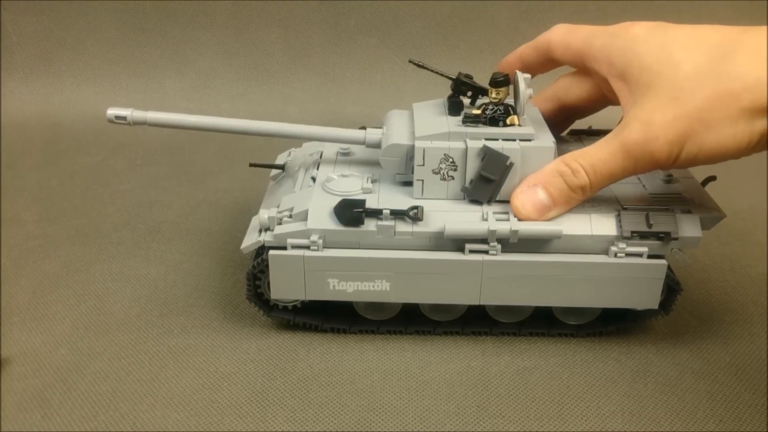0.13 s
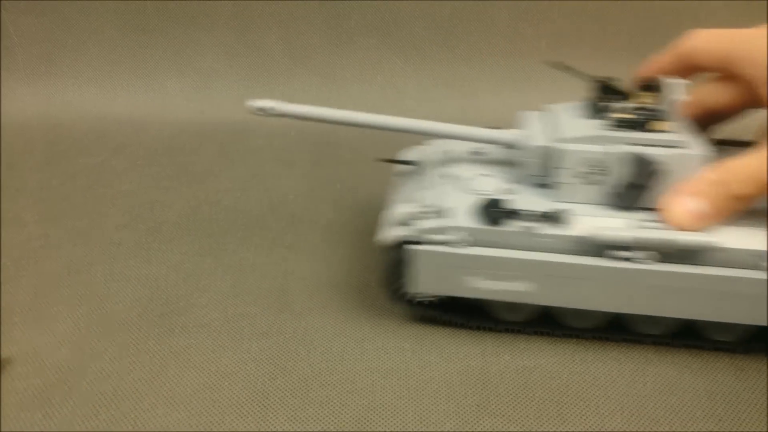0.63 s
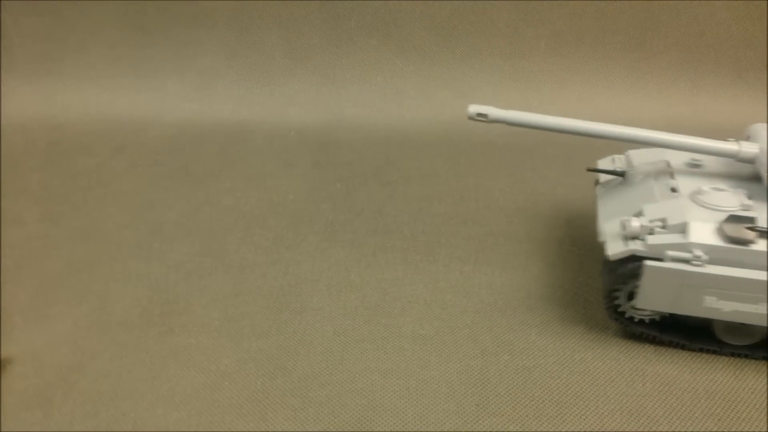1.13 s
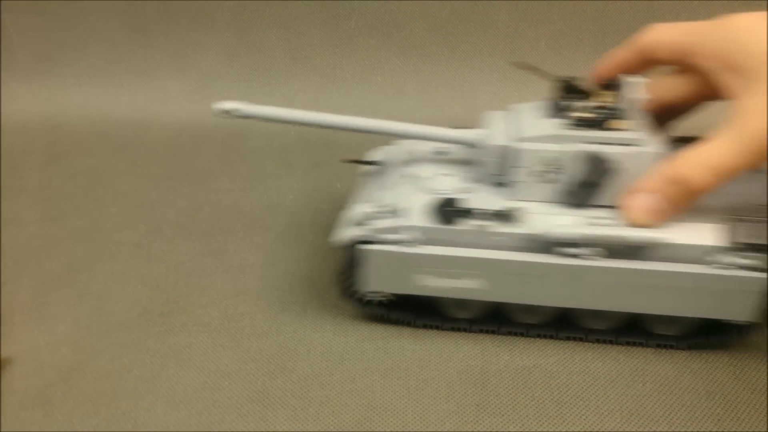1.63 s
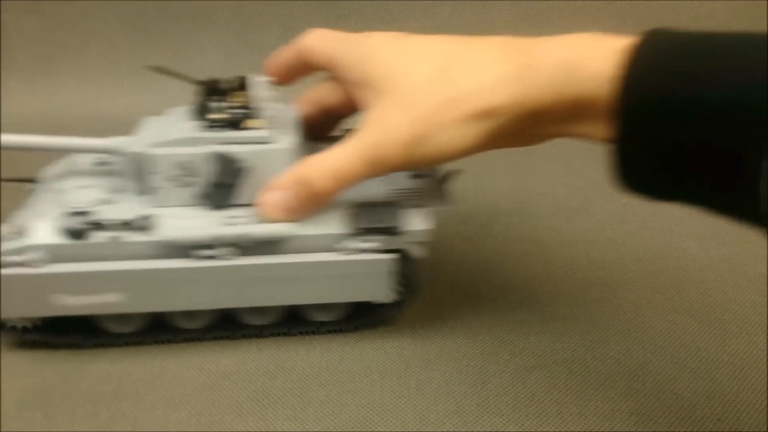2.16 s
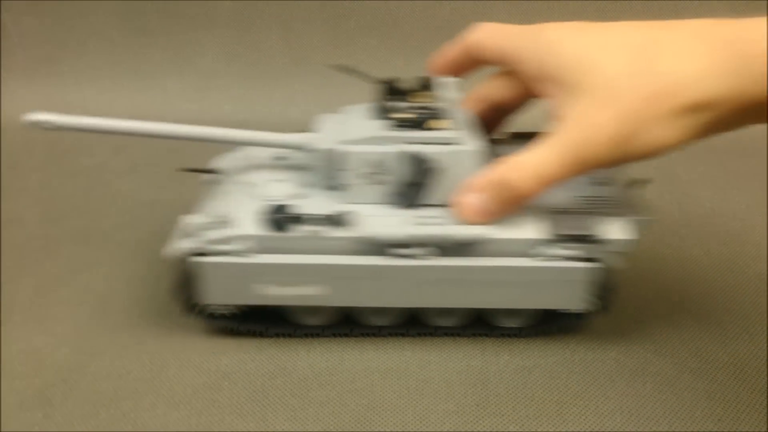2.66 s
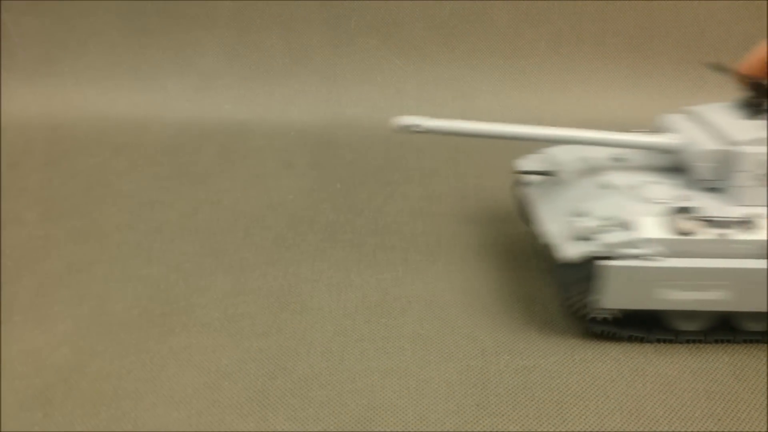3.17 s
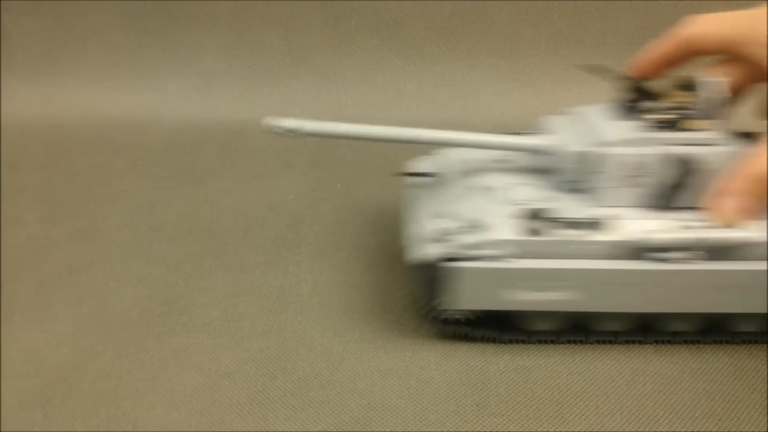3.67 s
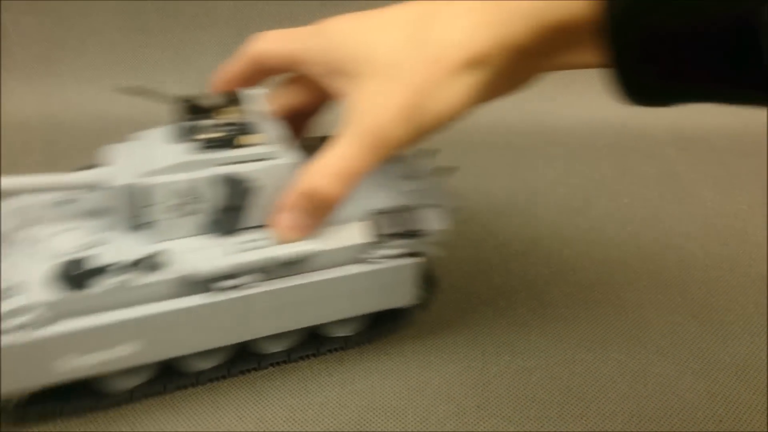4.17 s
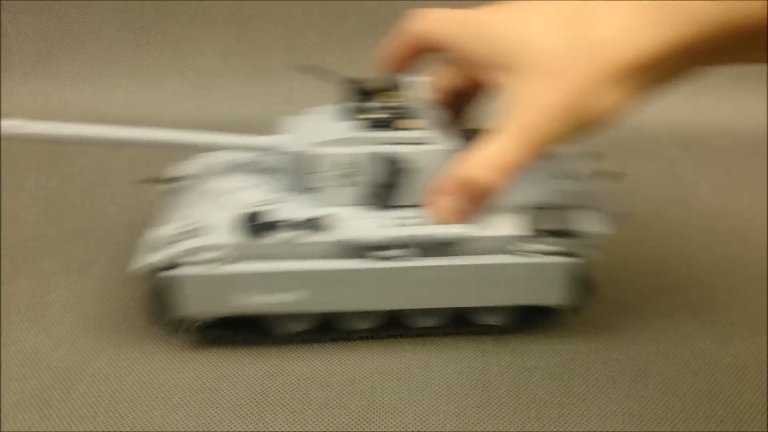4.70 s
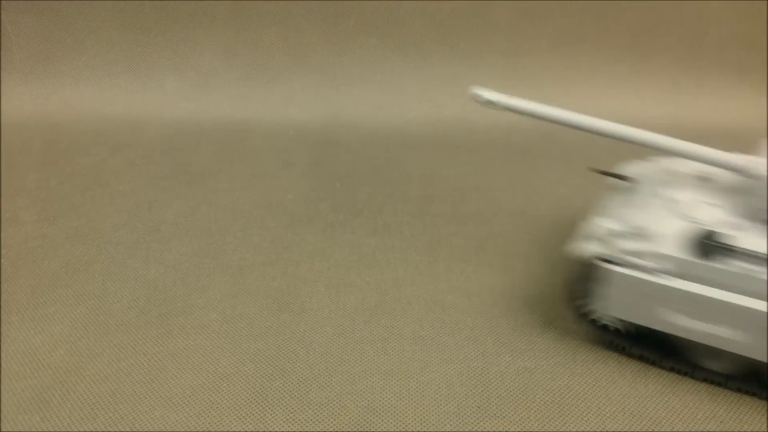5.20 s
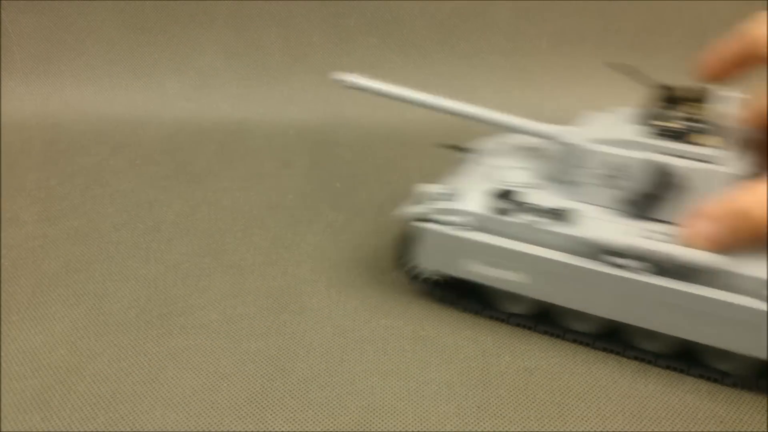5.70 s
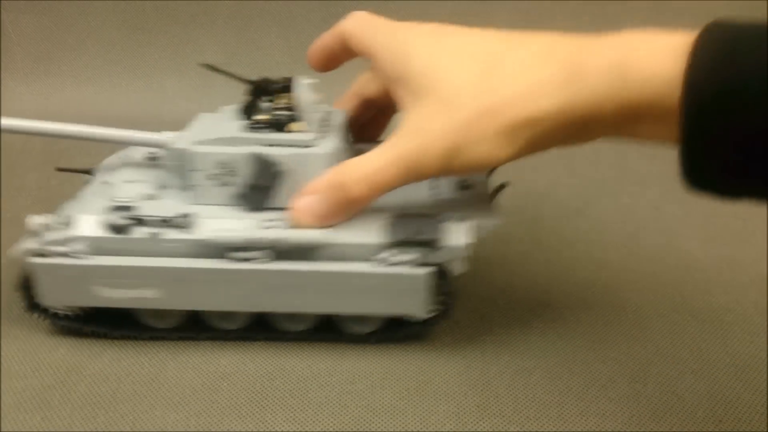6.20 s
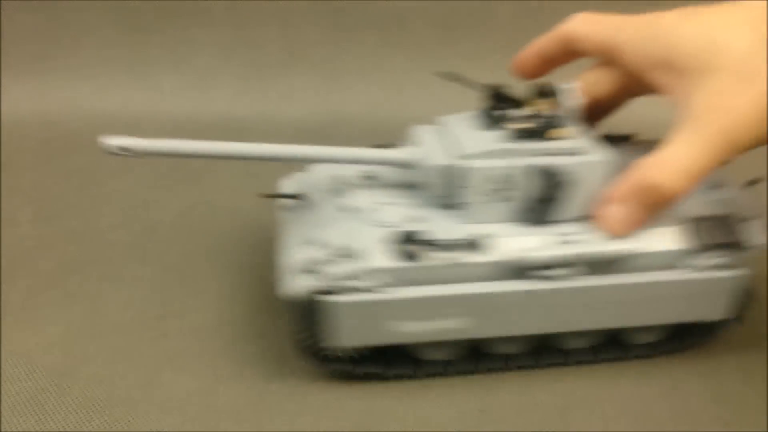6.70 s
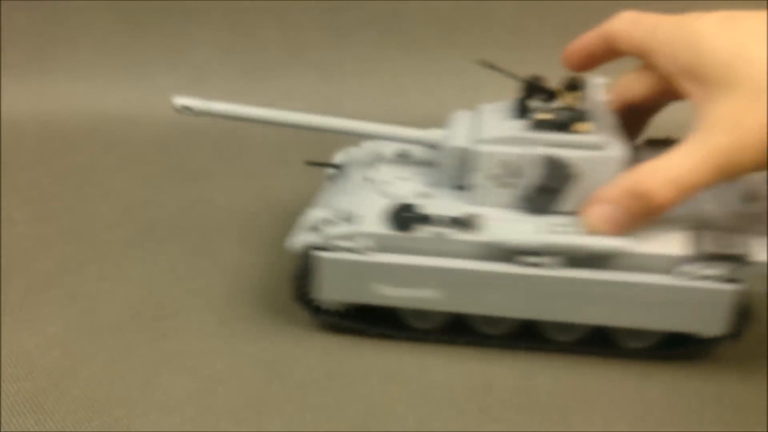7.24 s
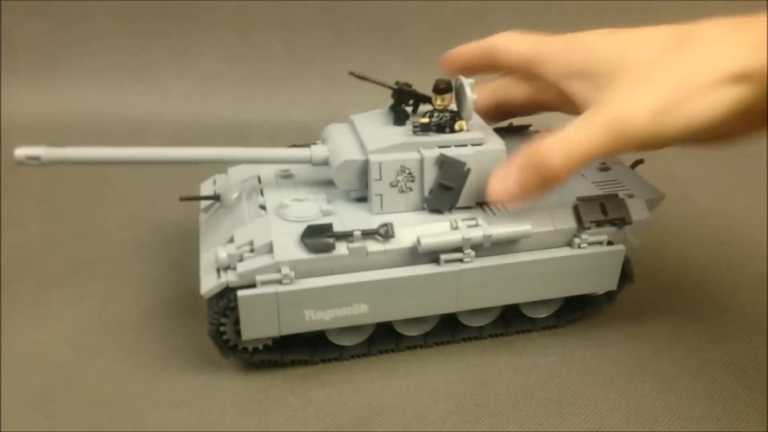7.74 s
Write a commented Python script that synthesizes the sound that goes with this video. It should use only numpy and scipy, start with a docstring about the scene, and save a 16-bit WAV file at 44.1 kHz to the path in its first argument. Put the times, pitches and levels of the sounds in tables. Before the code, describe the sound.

Close up in a quiet room, small plastic track links snap and rattle over sprocket teeth in about eight hand-driven strokes, each roughly a second or less, separated by brief lulls. Bright, dry clicks ride on a hollow hull rattle and a bassy table boom. Light taps come first; a gentler slow stroke finishes, with faint thin rising tones over soft room noise.

```python
"""Model tank on a cloth-covered table

A brick-built model tank is rolled back and forth by hand in a quiet room, after a few finger taps on its hull.
Track links snap over the sprocket teeth, up to about twenty times a second: bursts of clicks ring plastic modes.
Smaller contacts rattle between the snaps and stir hull and table top; the table booms and sways in the bass.
Steady noise of room and microphone lies below, and two faint tones glide up at the end."""
import sys
import numpy as np
from scipy import signal
from scipy.fft import rfft, irfft
from scipy.io import wavfile

SR = 44100
rng = np.random.default_rng(int(sys.argv[2]) if len(sys.argv) > 2 else 0)


def attenuation_scalar(level_db):
    """Turn a level in dB into a linear amplitude multiplier (20 dB per decade)."""
    decades = np.asarray(level_db, float) / 20
    return 10 ** decades


def log_audio(samples):
    """Write samples as a 16-bit WAV file to the path given in sys.argv[1]."""
    # one column per channel
    frames = np.atleast_2d(samples).T
    # limit to full scale, then quantise
    limited = np.clip(frames, -1, 1)
    pcm = np.round(limited * 32767).astype(np.int16)
    wavfile.write(sys.argv[1], SR, pcm)


N = 346317

# modes of the table top: (frequency [Hz], width [Hz], relative level [dB])
TABLE_MODES = [(200, 44, -15), (269.4, 31, -8), (331, 94, -9.5), (413, 270, -6.5), (577, 180, 0.5),
               (740, 147, 2), (856, 350, -9.5)]
# modes of the hollow hull: (frequency [Hz], width [Hz], relative level [dB])
HULL_MODES = [(1160, 150, -7.5), (1377, 170, -6.5), (1588, 117, -8.5), (1816, 104, -6.5), (2053, 340, -5.5)]
# low ring of the plastic links: (frequency [Hz], width [Hz], relative level [dB])
LOW_MODES = [(2520, 740, -1), (3092, 340, -5), (3390, 180, -10.5), (3750, 330, -6)]
# middle ring of the links: (frequency [Hz], width [Hz], relative level [dB])
MIDDLE_MODES = [(4160, 430, -9.5), (4814, 360, -4.5), (5075, 360, -13), (5140, 980, -9.5), (5750, 3100, -4)]
# bright ring of the links: (frequency [Hz], width [Hz], relative level [dB])
BRIGHT_MODES = [(6970, 940, -5.5), (7900, 410, -5), (8266, 630, 0.5), (8800, 1200, -10), (9490, 900, -9.5)]
# topmost edge of the ring: (frequency [Hz], width [Hz], relative level [dB])
EDGE_MODES = [(12260, 1800, 9), (13700, 1300, -17), (14300, 1200, -16), (13900, 1200, -48)]

FULL_SPEED_DB = -45  # rattle of a brisk stroke


def rms_one(x):
    """Scales a signal to rms 1."""
    return x / np.sqrt(np.mean(x ** 2) + 1e-20)


def drift(rate_hz):
    """Slow chance: noise through two equal one-pole lowpasses at this rate, rms 1."""
    r = np.exp(-2 * np.pi * rate_hz / SR)
    noise = rng.standard_normal(N + 9000)
    return rms_one(signal.lfilter([1], [1, -2 * r, r * r], noise)[9000:])


def controls(rows):
    """Columns of a curve table, interpolated per sample."""
    s, *columns = np.transpose(rows)
    return [np.interp(np.arange(N) / SR, s, c) for c in columns]


def ring(clicks, hz, width_hz):
    """A unit click sets a dying sine of starting height 1 ringing; a wider mode dies sooner."""
    r, w = np.exp(-np.pi * width_hz / SR), 2 * np.pi * hz / SR
    return signal.lfilter([0, np.sin(w)], [1, -2 * r * np.cos(w), r * r], clicks + 1e-18)


def within(modes, x):
    """Plastic meets plastic softly: little is heard far above or below the ringing range."""
    band_hz = [0.7 * modes[0][0], 1.15 * modes[-1][0]]
    return signal.sosfilt(signal.butter(3, band_hz, "band", fs=SR, output="sos"), x)


def rattle(modes, per_s, uneven_db, clumps, shift_db=0):
    """Random contacts in clumps stir every mode; the favoured modes shift as the load moves. Rms 1."""
    happens = rng.random(N) < per_s / SR
    size_db = uneven_db * np.minimum(rng.exponential(1, N), 4) + clumps
    sizes = attenuation_scalar(size_db) * happens
    out = np.zeros(N)
    for hz, width_hz, db in modes:
        favour = attenuation_scalar(db + shift_db * drift(6.0))
        contacts = sizes * rng.standard_normal(N)
        out += favour * np.sqrt(width_hz) * ring(contacts, hz, width_hz)
    return rms_one(within(modes, out))


def strike(modes, seconds, shape_db, rms_db, length_s, colour_db):
    """Bursts of contacts ring the modes, each favouring other ones, set to its rms level over its length."""
    at = np.minimum(seconds * SR, N - 1).astype(int)
    colour = colour_db * rng.standard_normal((len(at), 1, len(modes)))
    luck = rng.standard_normal((len(at), at.shape[1], len(modes)))

    def sound(gain):
        out = np.zeros(N)
        for k, (hz, width_hz, db) in enumerate(modes):
            heights = gain * attenuation_scalar(db + colour[..., k]) * luck[..., k]
            out += ring(np.bincount(at.ravel(), heights.ravel(), N), hz, width_hz)
        return within(modes, out)

    # a first pass finds the power of each burst, a second corrects its gain
    gain = attenuation_scalar(shape_db + rms_db)
    energy = np.cumsum(sound(gain) ** 2)
    span = (length_s * SR).astype(int) + 30
    start = at[:, :1]
    heard = (energy[np.minimum(start + span, N - 1)] - energy[start]) / span
    return sound(gain * attenuation_scalar(rms_db) / np.sqrt(heard))


def motion():
    """Levels [dB] of links, hull and treble through all strokes, dropping while the tracks stand still."""
    # before the first push: (time [s], rattle [dB], hull over rattle [dB], treble over rattle [dB])
    at_rest = (0.0, -78.5, 3, -1)
    # one list per push or pull of the hand; rattle grows with speed:
    # (time [s], rattle [dB], hull over rattle [dB], treble over rattle [dB])
    strokes = [
        [(0.45, -85, 5, -7), (0.544, -60, -1, -4), (0.718, -45, -0.5, -5.5), (0.848, -44, 1, -1),
         (0.908, -47, -2, -5), (0.964, -48, 2, 2.5), (1.134, -53.5, 1.5, -2), (1.26, -66, -1, -10)],
        [(1.28, -67.5, -1, -3), (1.408, -51.5, -0.5, -8), (1.596, -45.5, -2, -7), (1.666, -46, -0.5, -2.5),
         (2.044, -45, 0, -4.5), (2.212, -44.5, 3.5, -3), (2.336, -46, 1, -2), (2.43, -64, 8, -3)],
        [(2.45, -59, 2, -6), (2.562, -49, 1, -0.5), (2.714, -46, -0.5, -1), (2.8, -45, -2, 0.5),
         (3.074, -46.5, 3, 0), (3.302, -49, 0.5, -1), (3.424, -50.5, 5, -4.5), (3.52, -63, 3, -3)],
        [(3.54, -57.5, -3, -6), (3.66, -45.5, -1, -1.5), (3.802, -45, -0.5, 1), (3.852, -44, -2, 1),
         (4.1, -42.5, 0.5, -2.5), (4.256, -43, 5.5, -2.5), (4.386, -45.5, 3.5, -4), (4.5, -57.5, 10, -7)],
        [(4.52, -58.5, 2.5, -5), (4.64, -47.5, 2.5, -2), (4.786, -42.5, 0, 2), (4.838, -42, 1, 0),
         (5.098, -44, 3.5, -2), (5.188, -42.5, -0.5, -1), (5.388, -47.5, -1, -3.5), (5.5, -64, 5, -7)],
        [(5.52, -61.5, 5.5, -9), (5.63, -44, -0.5, -3), (5.778, -46.5, 1, 0.5), (6.114, -43.5, 4, -5),
         (6.184, -42.5, 4.5, -5), (6.308, -44, 0.5, -4.5), (6.42, -64, 5, -13)],
        [(6.44, -61.5, 5, -11), (6.572, -47, 0.5, 3), (6.704, -46, 5.5, 1), (6.79, -47, 3.5, 1.5),
         (6.882, -47.5, 2, 1.5), (7.006, -47.5, 4.5, -2), (7.13, -74, 7, -8)],
        [(7.16, -62, 1, -5), (7.254, -52.5, 0.5, -5), (7.384, -53, 0, -4), (7.472, -52.5, -0.5, -4),
         (7.544, -54, 3.5, 0), (7.7, -62, 5.5, -2), (7.85, -71, 4, -3)],
    ]
    # the hand turns round: (stop [s], restart [s], drop [dB])
    halts = [(0.3, 0.541, 2.5), (1.205, 1.34, 1), (2.398, 2.48, 7.5), (3.477, 3.568, 3), (4.46, 4.549, 9.5),
             (5.48, 5.544, 5.5), (6.385, 6.465, 5), (7.055, 7.155, 3), (7.72, 7.9, 5.5)]
    settle_s, catch_s = 0.025, 0.0069
    link, hull, bright = controls([at_rest] + [row for stroke in strokes for row in stroke])
    for stop, restart, drop_db in halts:
        corners_s = [stop - settle_s, stop, restart - catch_s, restart]
        link = link - np.interp(np.arange(N) / SR, corners_s, [0, drop_db, drop_db, 0])
    return link, link + hull, link + bright


def hush():
    """Steady noise of room and microphone, coloured in the spectrum."""
    # shape of the hush: (frequency [Hz], relative density [dB])
    air = [(53, -31), (90, -9.5), (114, -10.5), (170, -20), (256, -20), (390, -15), (570, -30),
           (1180, -29.5), (1600, -42), (7500, -45.5), (12000, -50), (15500, -43), (16400, -59)]
    points_hz, db = np.transpose(air)
    hz = np.maximum(np.fft.rfftfreq(N, 1 / SR), 1)
    colour = attenuation_scalar(np.interp(np.log(hz), np.log(points_hz), db))
    noise = irfft(rfft(rng.standard_normal(N)) * colour, N)
    return attenuation_scalar(-65) * rms_one(noise)


def whistle():
    """Two thin tones at a fixed pitch ratio glide up together at the end."""
    start_s, start_hz, rise_hz_per_s, level_db = 7.79, 8500, 15000, -76
    upper_ratio, upper_db = 1.235, -4  # upper tone against the lower
    t = np.maximum(np.arange(N) / SR - start_s, 0)
    phase = 2 * np.pi * (start_hz * t + rise_hz_per_s * t ** 2 / 2)
    fade_in = np.minimum(t / 0.012, 1)
    return attenuation_scalar(level_db) * fade_in * (np.sin(phase) + attenuation_scalar(upper_db) * np.sin(upper_ratio * phase))


def bass():
    """The table top booms and thumps under the weight, and the whole frame sways and heaves."""
    # boom of the table top: (frequency [Hz], width [Hz], relative level [dB])
    boom_modes = [(120, 30, -17), (153, 10, 0)]
    # thump of the table top: (frequency [Hz], width [Hz], relative level [dB])
    thump_modes = [(64.6, 10.6, -4.5), (86, 33, -6.5)]
    # sway of the frame: (frequency [Hz], width [Hz], relative level [dB])
    sway_modes = [(26.7, 7.7, -1), (36.6, 30, 1)]
    # slower heave of the frame: (frequency [Hz], width [Hz], relative level [dB])
    heave_modes = [(9, 8.5, 0.5), (14, 33, 2.4)]
    # course of the boom: (time [s], level [dB])
    boom_level = [(0.0, -72), (0.06, -85), (0.83, -59.5), (1.22, -68.5), (2.08, -51), (2.49, -67),
                  (2.53, -52.5), (3.26, -59.5), (3.48, -73), (3.82, -48.5), (4.44, -61), (5.18, -47.5),
                  (5.46, -73), (5.73, -48), (6.01, -62), (6.21, -52.5), (6.43, -74), (6.52, -57.5),
                  (6.95, -55.5), (7.06, -69), (7.54, -58.5), (7.85, -72)]
    # course of the frame's motion, before it wavers: (time [s], sway [dB], heave [dB])
    frame_level = [(0.0, -31, -69), (0.08, -56.5, -54), (2.41, -49, -53.5), (3.45, -60.5, -58.5),
                   (3.54, -48.5, -52.5), (5.42, -53, -57.5), (5.64, -66, -44.5), (5.77, -54, -70),
                   (6.08, -55, -43.5), (7.45, -49, -38), (7.63, -42, -51), (7.85, -49, -43)]
    boom_db, = controls(boom_level)
    # at full speed -49 dB; follows 0.45 of the rattle's swing and wavers by 1 dB
    thump_db = -49 + 0.45 * (motion()[0] - FULL_SPEED_DB) + 1 * drift(3.3)
    sway_db, heave_db = (db + 4 * drift(1.56) for db in controls(frame_level))
    parts = [(boom_db, boom_modes), (thump_db, thump_modes), (sway_db, sway_modes), (heave_db, heave_modes)]
    return sum(attenuation_scalar(db) * rattle(modes, per_s=980, uneven_db=2.0, clumps=0) for db, modes in parts)


def taps():
    """A fingertip lands softly in a few contacts and stirs table and hull."""
    # finger taps before the first push: (time [s], deep table [dB], upper table [dB], hull [dB])
    tap_rows = [(0.258, -68, -68, -84), (0.27, -67, -64, -80), (0.287, -73, -68, -85),
                (0.301, -82, -74, -82), (0.333, -61, -67, -65), (0.342, -62, -67, -67),
                (0.385, -59, -73, -71)]
    s, deep, upper, hull = np.transpose(tap_rows)[:, :, None]
    seconds = s + 0.0037 * np.sort(rng.random((len(tap_rows), 4)), axis=1)
    flat, length_s = np.zeros_like(seconds), np.full_like(s, 0.0084)
    parts = [(TABLE_MODES[1:4], deep), (TABLE_MODES[4:], upper), (HULL_MODES, hull)]
    return sum(strike(modes, seconds, flat, db, length_s, colour_db=3.0) for modes, db in parts)


def rolling():
    """Small contacts of links, wheels and cloth ring each part; jolts shake all parts at once."""
    link_db, hull_db, bright_db = motion()
    hull, link, bright = attenuation_scalar([hull_db, link_db, bright_db])
    # the table rumbles at -49.5 dB at full speed and follows 0.71 of the rattle's swing
    table = attenuation_scalar(-49.5 + 0.71 * (link_db - FULL_SPEED_DB))
    jolts = drift(70)
    links = LOW_MODES + MIDDLE_MODES
    tank = hull * rattle(HULL_MODES, 1200, 1.3, 1.2 * jolts + 0.2 * drift(60), shift_db=1.5)
    tank += link * rattle(links, 2000, 0.53, 0.57 * jolts + 0.25 * drift(60), shift_db=0.44)
    tank += bright * rattle(BRIGHT_MODES, 2800, 2.5, 1.8 * jolts + 2.1 * drift(60), shift_db=-0.4)
    tank += bright * attenuation_scalar(-22.5) * rattle(EDGE_MODES, 5000, 1.5, 1.2 * jolts)
    # lone sharp ticks
    tank += bright * attenuation_scalar(-5.0) * rattle(links + BRIGHT_MODES, 110, 3.3, 0)
    return tank + table * rattle(TABLE_MODES, 1200, 1.8, 0.59 * jolts, shift_db=1.23)


def small_snaps():
    """Rows like the loud snaps, at random moments, as strong as the speed allows."""
    count, spread_db = 220, 3.5
    over_rattle_db = (-0.3, 1.5, -0.5)  # middle, low and bright ring
    s = rng.random(count) * (N - 1) / SR
    rattle_db = motion()[0][(s * SR).astype(int), None]
    levels = rattle_db + over_rattle_db + spread_db * rng.standard_normal((count, 3))
    length_ms = rng.uniform(0.72, 4.8, count)
    return np.column_stack([s, levels, length_ms])


def snaps():
    """A link seats in a burst of tiny contacts that swells fast and leaves a ragged tail."""
    # snaps that stand out: (time [s], middle ring [dB], low ring [dB], bright ring [dB], length [ms])
    loud_snaps = [(0.4538, -79, -69, -76, 3.4), (0.4804, -72, -64, -71, 6.6), (0.5104, -74, -62, -72, 5.9),
                  (0.5435, -68, -54, -62, 6.8), (0.5512, -65, -55, -65, 5.3), (0.593, -64, -47, -46, 4.6),
                  (0.642, -63, -60, -44, 1.1), (0.6727, -51, -43, -42, 5.1),
                  (0.6975, -26.5, -27.5, -29.5, 3.1), (0.7082, -42, -36, -35, 5.3),
                  (0.7519, -30, -30.5, -30.5, 5.1), (0.796, -34, -29, -32.5, 7.3),
                  (0.8018, -30, -39, -27, 4), (0.8387, -38, -36, -38, 4.9),
                  (0.8507, -24.5, -31, -29.5, 4.7), (0.8814, -42, -35, -37, 7.8),
                  (0.8992, -23.5, -33, -30.5, 3.7), (0.927, -45, -37, -43, 2.6),
                  (0.948, -28.5, -29.5, -25.5, 4.8), (0.9976, -28.5, -30, -25.5, 4.9),
                  (1.049, -29.5, -30, -30.5, 5), (1.1062, -36.5, -33.5, -36, 5.4),
                  (1.3502, -53, -51, -47, 2.7), (1.3953, -61, -56, -48, 4.7), (1.422, -49, -53, -48, 3.8),
                  (1.4496, -37, -35, -42, 5.2), (1.476, -50, -50, -42, 3), (1.4932, -37, -32, -39, 6.6),
                  (1.4994, -33, -34, -32.5, 5.9), (1.526, -48, -57, -41, 6.7), (1.547, -34, -34, -35, 7.5),
                  (1.5523, -27.5, -52, -39, 2.1), (1.5748, -43, -54, -34, 1.7),
                  (1.6012, -30, -37, -30.5, 2.1), (1.646, -31, -33, -32.5, 5.7),
                  (1.6979, -23.5, -30, -30.5, 1.85), (1.7421, -37, -34, -32, 4.4),
                  (1.7462, -28.5, -41, -33, 1.84), (1.7913, -33.5, -35, -33, 5),
                  (1.8359, -35, -39, -33.5, 3.9), (1.8413, -30, -34, -34, 3.6),
                  (1.8843, -30, -34.5, -31, 4.9), (1.8875, -34, -45, -34, 5.8),
                  (1.9327, -33.5, -38, -31.5, 7.6), (1.9791, -24.5, -34, -30.5, 4.2),
                  (2.0259, -28, -33.5, -33, 4), (2.0708, -25, -32, -34, 2.26),
                  (2.075, -34, -32, -28.5, 1.9), (2.1195, -30, -38, -34, 3.7),
                  (2.1214, -31, -35, -31.5, 3.4), (2.1397, -49, -50, -37, 2.4),
                  (2.171, -27, -31.5, -30.5, 3.6), (2.1847, -46, -45, -44, 2.4),
                  (2.215, -27, -31, -29, 5.5), (2.264, -24.5, -34, -25.5, 2.9),
                  (2.3127, -24, -31.5, -31, 2.15), (2.3617, -35, -36.5, -37, 2.14),
                  (2.6137, -21, -28, -27, 1.85), (2.666, -38, -39, -35.5, 3.1),
                  (2.6967, -42, -38.5, -57, 2.1), (2.8294, -33.5, -39, -38, 2.4),
                  (2.8745, -40, -52, -38, 3.3), (2.9032, -45, -36, -50, 1.9),
                  (3.0651, -51, -52, -38.5, 4.1), (3.4224, -31.5, -35, -34.5, 5),
                  (3.4444, -27, -38, -46.5, 1.9), (3.6674, -32, -32, -33.5, 2.64),
                  (3.6785, -33, -30, -38, 4.2), (3.7146, -27, -37, -33.5, 2.4),
                  (3.9114, -37, -39, -36, 1.3), (3.944, -46, -36, -31.5, 1.6), (3.973, -42, -47, -31, 1.8),
                  (4.0511, -47, -39, -42, 1.9), (4.0869, -49, -36.5, -36, 1.97),
                  (4.2838, -45, -51, -37.5, 5.5), (4.5555, -55, -56, -51, 4.9),
                  (4.6028, -49, -47, -55, 5.6), (4.6557, -38, -37.5, -38.5, 5.5),
                  (4.6972, -39, -34, -32, 4.0), (4.778, -24.5, -30.5, -32, 2.2),
                  (4.8209, -20, -31, -24.5, 2.17), (4.864, -17.5, -33, -24, 2.2),
                  (4.8794, -48, -49, -36, 7.1), (4.9056, -22, -34, -29, 2.1), (4.9264, -37, -35, -40, 5.9),
                  (4.949, -30, -47, -43, 1.9), (5.141, -48, -57, -34.5, 1.13), (5.2022, -40, -35, -36, 1.5),
                  (5.4454, -44, -46, -49, 4.2), (5.4694, -49, -53, -52, 3.6), (5.5228, -60, -59, -54, 3.7),
                  (5.542, -52, -51, -55, 2), (5.5667, -51, -44, -44, 4.2), (5.6287, -28, -37, -30.5, 2.2),
                  (5.7249, -35, -47, -34, 2.03), (5.7462, -36, -58, -37, 1.1), (5.7568, -38, -48, -34, 1.6),
                  (5.8113, -40.5, -50, -34, 1.9), (5.8539, -36, -42, -57, 4.9),
                  (6.0806, -42, -45, -36.5, 2.9), (6.1543, -21, -30, -23.5, 2.34),
                  (6.1976, -22.5, -33.5, -28.5, 3.3), (6.2391, -33, -39, -35.5, 6.0),
                  (6.2635, -39, -56, -35, 1.1), (6.3413, -55, -51, -54, 3), (6.3783, -57, -51, -56, 6),
                  (6.4757, -54, -61, -63, 2.5), (6.529, -47, -63, -39, 2.7), (6.5919, -35, -38, -40, 5.4),
                  (6.6036, -23.5, -30, -33, 1.8), (6.6387, -40, -35, -28.5, 6.5),
                  (6.6449, -20.5, -27, -27.5, 1.9), (6.6886, -34, -38, -35, 9.2),
                  (6.7374, -32, -31.5, -31.5, 4.5), (6.7406, -31.5, -47, -35, 6.8),
                  (6.786, -38, -33, -31, 5.4), (6.8358, -31, -32.5, -30.5, 5.1),
                  (6.8906, -36, -39, -38.5, 7.2), (7.03, -37, -45, -41, 5.5), (7.151, -66, -55.5, -68, 8),
                  (7.1731, -61, -70, -52, 1.1), (7.223, -51, -46, -44, 3.7), (7.2788, -51, -50, -39, 4.9),
                  (7.305, -32, -36, -34.5, 5.9), (7.3087, -50, -37, -36, 2.76),
                  (7.3343, -43, -53, -40, 4.7), (7.3645, -45, -44, -44, 4.4), (7.3901, -51, -53, -43, 1.5),
                  (7.4183, -32, -33, -35.5, 4.1), (7.517, -49, -46, -51, 1), (7.5483, -51, -42, -58, 2.8),
                  (7.5924, -36.5, -38.5, -38, 6), (7.5974, -38, -36, -38.5, 3.7),
                  (7.6272, -49, -59, -45, 1.6), (7.6554, -54, -47, -52, 5.4),
                  (7.6968, -56, -53.5, -64, 2.6), (7.731, -60, -61, -59, 4.8)]
    rows = np.vstack([loud_snaps, small_snaps()])
    s, middle, low, bright, length_ms = rows.T[:, :, None]
    link_db, hull_db, _ = (db[(s * SR).astype(int)] for db in motion())
    hull = low - 6.5 + 0.69 * (hull_db - link_db)  # a loaded hull knocks more
    # 30 contacts, delays in snap lengths, ever sparser
    late = 2.3 * (np.arange(30) + rng.random((len(rows), 30))) ** 1.4 / 30 ** 1.3
    length_s = np.clip(length_ms, 0.5, 10) / 1000
    swell_db = -9 * np.exp(-late * length_s / 0.0002)
    shape_db = -9.0 * late + swell_db
    edge = np.maximum(middle - 3.0, bright) - 17
    parts = [(MIDDLE_MODES, middle), (LOW_MODES, low), (BRIGHT_MODES, bright), (HULL_MODES, hull),
             (EDGE_MODES, edge)]
    seconds = s + late * length_s
    return sum(strike(modes, seconds, shape_db, db, length_s, colour_db=4.0) for modes, db in parts)


def room(x):
    """A dense tail of dull reflections that starts after 4 ms."""
    t60_s, wall_cut_hz = 0.3, 5000
    t = np.arange(SR // 2) / SR
    tail = rng.standard_normal(len(t)) * attenuation_scalar(-60 * t / t60_s) * (t > 0.004)
    tail = signal.lfilter(*signal.butter(1, wall_cut_hz, fs=SR), tail)
    return signal.fftconvolve(x, tail / np.sqrt(np.sum(tail ** 2)))[:N]


def table_bounce(x):
    """The bounce off the table top cancels a band of the direct sound."""
    dip_hz, dip_width_hz, dip_share = 2280, 126, 0.87
    band = signal.lfilter(*signal.iirpeak(dip_hz, dip_hz / dip_width_hz, fs=SR), x)
    return x - dip_share * band


def scene():
    """Tank on its table, in the room, as one channel."""
    tank = table_bounce(rolling() + snaps() + taps())
    mix = tank + attenuation_scalar(-22) * room(tank) + bass() + whistle() + hush()
    return mix[None]


def band_limit(x):
    """A steep low-pass at the top of the band."""
    return signal.sosfilt(signal.butter(12, 16810, fs=SR, output="sos"), x)


def record(dry):
    """The microphone's top treble is cut steeply, 50 dB down from 17.1 kHz."""
    mix = signal.sosfilt(signal.cheby2(10, 50, 17100, fs=SR, output="sos"), dry)
    return band_limit(mix)


dry = scene()
out = record(dry)
log_audio(out)
```